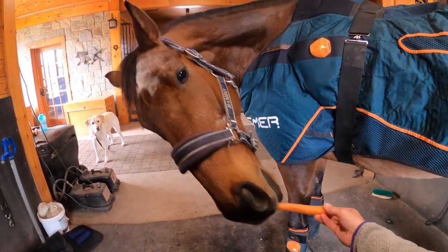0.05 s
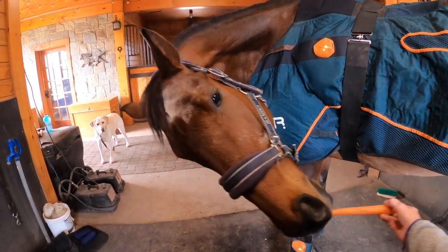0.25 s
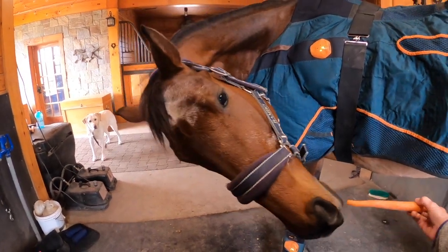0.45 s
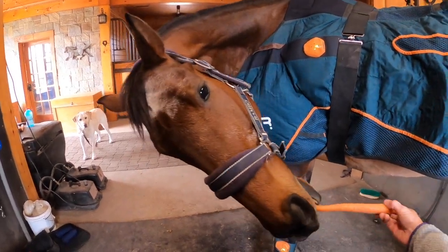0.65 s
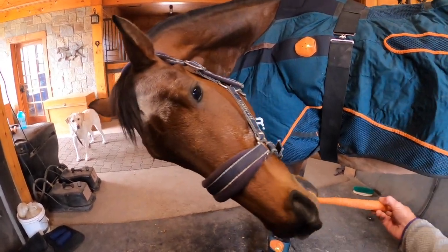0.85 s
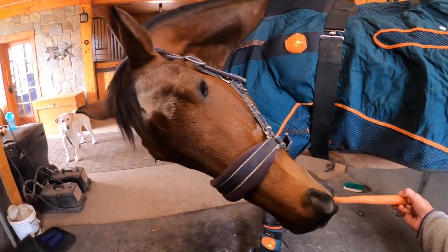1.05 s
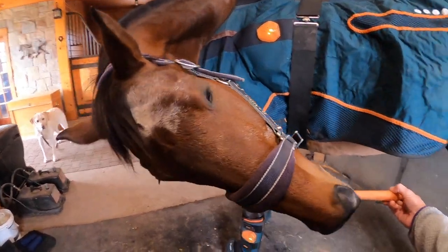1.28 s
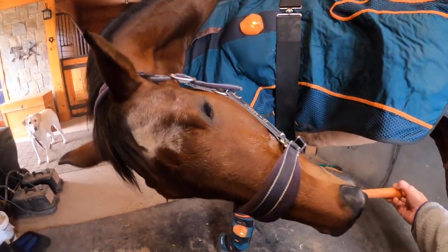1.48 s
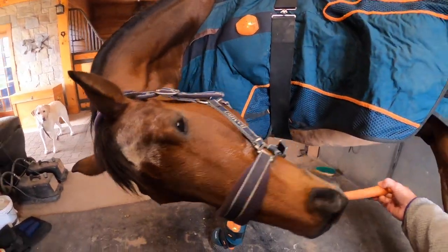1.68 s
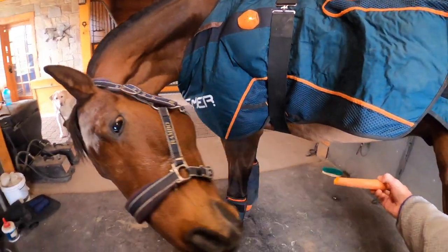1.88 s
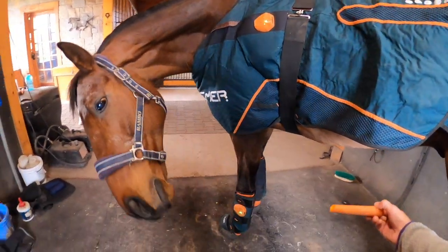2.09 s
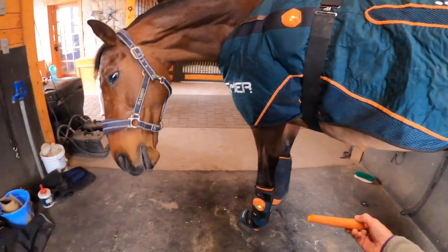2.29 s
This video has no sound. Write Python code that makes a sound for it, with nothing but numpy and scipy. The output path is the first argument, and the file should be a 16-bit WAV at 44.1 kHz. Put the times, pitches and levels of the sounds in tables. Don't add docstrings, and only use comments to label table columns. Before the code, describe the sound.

Sharp crunchy snap of a carrot bitten by a horse, after soft lip and tooth knocks

```python
import sys
import numpy as np
from scipy import signal
from scipy.fft import rfft, irfft
from scipy.io import wavfile
from scipy.ndimage import uniform_filter1d

SR = 44100
rng = np.random.default_rng(int(sys.argv[2]) if len(sys.argv) > 2 else 0)


def how_loud(loudness_db):
    steps = np.asarray(loudness_db, float) / 20
    return 10 ** steps


def log_audio(samples):
    frames = np.atleast_2d(samples).T
    limited = np.clip(frames, -1, 1)
    pcm = np.round(limited * 32767).astype(np.int16)
    wavfile.write(sys.argv[1], SR, pcm)


N = 102885

# start_s, level_db, brightness_db
CRACKS = [
    (1.8098, -23.5, -12),
    (1.8233, -14, -18),
    (1.8279, -8, -9),
    (1.8302, -7.5, -1.5),
    (1.834, -19, -4),
]
# start_s, level_db, decay_s
TEARS = [
    (1.8098, -41.5, .002),
    (1.8235, -28, .004),
    (1.8278, -12.5, 0.00093),
    (1.8290, -9, 0.0014),
    (1.8312, -17.5, 0.0019),
    (1.8335, -16, 0.00082),
    (1.8350, -14.5, 0.0012),
    (1.8377, -22, .003),
    (1.842, -28, .004),
]
# pitch_hz, level_db, t60_s
JAW_MODES = [(399, -2, 0.036), (618, -3.5, 0.032), (851, -13, 0.026), (1287, 1.5, 0.011),
             (1419, -5.5, 0.02), (1977, -6, 0.023), (2380, -1.5, 0.012), (2807, -6, 0.014),
             (3400, -5.5, 0.0035)]
# pitch_hz, level_db, t60_s
SPLINTER_MODES = [(3620, -8.5, 0.00087), (5360, -10.5, 0.0021), (6950, -6.5, 0.0018), (7940, -2, 0.0023),
                  (9130, -2.5, 0.0019), (10520, -5, 0.0012), (13000, -10.5, 0.0011), (15400, -14, 0.0013)]
# start_s, level_db, pitch_hz, t60_s, hold_s
CHOMPS = [
    (1.8236, -20, 450, 0.0051, 0.00063),
    (1.8296, -10.5, 233.6, 0.042, 0.00046),
    (1.8555, -25.5, 251.5, 0.037, .009),
    (1.873, -31, 274, 0.034, 0.0018),
    (1.886, -29, 242, 0.046, .003),
]
# start_s, level_db, pitch_hz, t60_s, hold_s
KNOCKS = [(.020, -46, 396, .03, .001), (.043, -46, 397, 0.086, .001), (.070, -47.5, 397, 0.069, 0.0011),
          (.1418, -26, 893, 0.012, .0005), (.1425, -28.5, 575, 0.01, 0.00038),
          (.1435, -35.5, 300, 0.045, 0.00085), (.4032, -38.5, 680, 0.0089, .0005),
          (.4038, -39, 372, 0.021, 0.0084), (.780, -48, 216, 0.036, .001), (.825, -50, 246, 0.1, .001),
          (.935, -48.5, 620, 0.036, .001), (.999, -45, 370, 0.056, 0.0023), (1.03, -54, 294, .03, .001),
          (1.058, -48.5, 305, 0.095, .001), (1.272, -43, 194, 0.031, 0.0027),
          (1.535, -46, 730, 0.02, 0.0009), (1.6728, -33.5, 680, 0.0085, 0.0006),
          (1.6732, -32.5, 317, 0.025, 0.0081), (1.694, -36.5, 460, 0.018, .001),
          (1.718, -44, 550, .012, .001), (1.731, -38, 450, 0.016, .001), (1.739, -31.5, 276, 0.026, .001),
          (1.748, -37, 176, 0.13, .001), (1.764, -39.5, 615, 0.013, .001),
          (2.0068, -32.5, 1000, 0.008, .0005), (1.796, -40, 440, .02, .002),
          (1.99, -42.5, 231, 0.044, 0.0034), (2.072, -45, 400, 0.023, 0.0019),
          (2.098, -45, 840, .015, .001), (.3565, -46.5, 1750, .012, 0.00075),
          (.456, -50, 2070, 0.013, .001), (2.303, -49, 690, 0.044, .001), (2.105, -36, 523, 0.028, .001)]
# start_s, level_db, pitch_hz, snap_db
TICKS = [(0.034, -41, 2840, -5), (0.0784, -42, 3760, -7), (0.143, -49, 3600, -8), (0.1678, -40, 4100, -5),
         (.175, -47, 4280, -3), (0.3166, -40.5, 4120, -12), (0.3572, -44.5, 7500, 5.5),
         (0.372, -46.5, 2980, -8), (0.401, -48, 3920, -17), (0.611, -43, 3650, -13), (.711, -42, 8500, -11),
         (0.9158, -47.5, 2870, -4), (0.9664, -41, 2500, -10), (.977, -43.5, 4170, -12),
         (1.0005, -42, 9000, -6), (1.0777, -46.5, 9000, -3), (1.272, -40, 13000, -14),
         (1.357, -49, 6000, 7), (1.4178, -34, 2700, -27.5), (1.6125, -36, 7700, -14),
         (1.646, -36, 7960, -7), (2.071, -40, 3660, -19)]
# start_s, length_s, level_db, centre_hz, sharpness (Q, no unit)
SCUFFS = [(.0, 0.11, -58.5, 1390, 6.1), (0, 0.058, -62.5, 2330, 0.81), (.558, 0.038, -60.5, 1000, 1.3),
          (.572, 0.049, -53, 1250, 1.8), (.58, 0.043, -57, 1520, 2.5), (.64, 0.028, -62, 1500, 2),
          (0.56, 0.08, -58.5, 2200, 0.48), (1.2, 0.039, -61, 2600, 1.2), (1.512, 0.091, -67, 1700, 0.7),
          (1.998, 0.11, -59, 910, 0.38), (0.055, 0.033, -58, 250, 1.2), (1.74, 0.053, -64, 7300, 0.79),
          (1.6, 0.063, -66, 1830, 1.2)]
# time_s, level_db
NECK_EFFORT = [(0, -62), (.3, -67), (1.05, -68), (1.2, -59), (1.38, -60.5), (1.5, -58.5), (1.56, -57),
               (1.8, -57), (2.05, -55.5), (2.15, -59), (2.33, -59)]
# frequency_hz, density_db (dB per Hz)
CLOTH_COLOUR = [(88, -20), (150, -6.5), (495, 4), (1110, -2.5), (1300, -4), (1670, -3), (2920, -7),
                (8100, -13), (15000, -25.5)]
# time_s, sway_db, shake_db
HAND_SWAY = [(0.0, -56, -65), (0.04, -40, -46), (0.35, -28.5, -52), (0.52, -41, -51), (0.84, -34, -57),
             (0.95, -40, -56), (1.31, -26, -37.5), (1.52, -23, -42), (1.54, -32, -60), (1.63, -17, -58),
             (1.67, -25.5, -55), (1.851, -32, -53), (1.89, -16.5, -56), (1.93, -24.5, -61),
             (2.111, -21, -62), (2.21, -26, -40), (2.29, -27, -41), (2.33, -46, -47)]
# frequency_hz, t60_s, level_db
AISLE_DECAY = [(190, 0.42, -23), (298, 0.38, -24), (450, 0.45, -29), (680, 0.39, -20.5), (900, 0.49, -19.5),
               (1420, .42, -25.5), (1700, 0.36, -22), (2480, 0.4, -22), (3380, 0.41, -20),
               (4560, 0.36, -18.5), (6300, 0.32, -20.5), (8100, 0.32, -19), (11100, 0.24, -17.5),
               (14000, 0.21, -25)]
# frequency_hz, density_db (dB per Hz)
HUSH_COLOUR = [(53, -9), (90, -1), (151, -2), (266, -4), (1680, -12), (1870, -14), (2230, -14.5),
               (15000, -23), (16000, -24.5)]

PUSH_S = 0.00034
FIBRES_PER_S, FIBRE_DB = 15000, -10.5
GLIDE, GLIDE_S = 0.31, 0.002
TICK_CYCLES, TICK_DB = 21, -0.5
CLOTH_DB, CLOTH_GRAIN_DB, CLOTH_GAIN = -52.5, 1.5, 1.3
SWAY_HZ, SHAKE_HZ, OFFSET = 12.35, 29, -0.00074
AISLE_DELAY_S = 0.0046
HUSH_DB = -58.5
RADIATE_HZ = 150
TOP_HZ = 15850


def unit(x):
    return x / np.sqrt(np.mean(x ** 2))


def band(x, hz, q):
    edges = np.clip([hz / (1 + .5 / q), hz * (1 + .5 / q)], 1, .45 * SR)
    return signal.sosfilt(signal.butter(2, edges, "bandpass", fs=SR, output="sos"), x)


def colour(x, table):
    hz, db = np.array(table).T
    f = np.fft.rfftfreq(len(x), 1 / SR) + 1
    return irfft(rfft(x) * how_loud(np.interp(np.log(f), np.log(hz), db)), len(x))


def smooth_twice(x, first, second):
    return uniform_filter1d(uniform_filter1d(x, first), second)


def walk(rate):
    k = int(SR / rate)
    steps = np.repeat(rng.standard_normal(N // k + 1), k)
    return unit(smooth_twice(steps, k, k)[:N])


def decay(t, t60):
    return np.exp(-np.log(1000) * t / t60)


def ring(hz, t60, rise_s=0.0006, glide=0., hold_s=0.):
    t = np.arange(8192) / SR
    turns = hz * (t + glide * GLIDE_S * (1 - np.exp(-t / GLIDE_S)))
    push = 1 - np.exp(-t / rise_s)
    return np.sin(2 * np.pi * turns) * decay(np.maximum(t - hold_s, 0), t60) * push


def add(out, s, x):
    i = int(s * SR)
    out[i:i + len(x)] += x[:len(out) - i]


def crack_jaw(out):
    detunes = rng.random((len(CRACKS), len(JAW_MODES)))
    for (s, db, bright_db), detune in zip(CRACKS, detunes):
        rise_s = PUSH_S * how_loud(-.8 * bright_db)
        for (hz, mode_db, t60), d in zip(JAW_MODES, detune):
            mode = ring(hz * (1 + 0.022 * (d - .5)), t60, rise_s)
            add(out, s, how_loud(db) * .5 * how_loud(mode_db) * mode)


def tear_fibres(out):
    t = np.arange(2048) / SR
    splinter = sum(how_loud(g) * ring(hz, t60, rise_s=.00005) for hz, g, t60 in SPLINTER_MODES)[:2048]
    draws = rng.random((len(TEARS), 3, 2048))
    for (s, db, decay_s), (hit, size, sign) in zip(TEARS, draws):
        breaks = (hit < FIBRES_PER_S / SR) * -np.log(size + 1e-9) * np.sign(sign - .5)
        spray = breaks * np.exp(-t / decay_s)
        add(out, s, how_loud(db + FIBRE_DB) * signal.fftconvolve(spray, splinter))


def snap():
    out = np.zeros(N)
    crack_jaw(out)
    tear_fibres(out)
    return out


def knocks(table, glide):
    out = np.zeros(N)
    for s, db, hz, t60, hold_s in table:
        body = ring(hz, t60, 0.00074, glide, hold_s)
        second = 0.32 * ring(1.88 * hz, 0.54 * t60, 0.00063, glide)
        third = 0.059 * ring(2.8 * hz, 0.37 * t60, 0.0004)
        add(out, s, how_loud(db) * (body + second + third))
    return out


def ticks():
    out = np.zeros(N)
    fade = np.exp(-np.arange(256) / SR / 0.0018)
    for (s, db, hz, snap_db), noise in zip(TICKS, rng.standard_normal((len(TICKS), 256))):
        t60 = TICK_CYCLES / hz
        pair = ring(hz, t60, rise_s=0.00021)
        pair = pair + 0.38 * ring(min(1.136 * hz, .4 * SR), t60, rise_s=0.00026)
        add(out, s, how_loud(db + TICK_DB) * pair)
        add(out, s, how_loud(db + TICK_DB + snap_db) * band(noise * fade, 6250, 0.86))
    return out


def grains(spread_db):
    return rng.standard_normal(N) * how_loud(spread_db * walk(700))


def cloth(t):
    s, db = np.array(NECK_EFFORT).T
    effort = CLOTH_GAIN * (np.interp(t, s, db) - db.max())
    rough = grains(CLOTH_GRAIN_DB)
    out = unit(colour(rough, CLOTH_COLOUR)) * how_loud(CLOTH_DB + effort + .8 * walk(14))
    for s, length, db, hz, q in SCUFFS:
        stroke = np.sin(np.pi * np.clip((t - s) / length, 0, 1))
        out = out + how_loud(db + 2.9 * walk(150)) * stroke * unit(band(rough, hz, q))
    return out


def sway(t):
    s, slow_db, shake_db = np.array(HAND_SWAY).T
    slow = colour(rng.standard_normal(N), [(1.5, -20), (3, 0), (SWAY_HZ, -5), (22, -35), (50, -90)])
    slow = slow / np.sqrt(smooth_twice(slow ** 2, 5000, 3000))
    shake = band(rng.standard_normal(N), SHAKE_HZ, 0.78)
    shake = unit(band(shake, SHAKE_HZ, 0.78))
    slow = slow * how_loud(np.interp(t, s, slow_db))
    return slow + shake * how_loud(np.interp(t, s, shake_db) - 6) + OFFSET


def aisle(x):
    t = np.arange(22050) / SR
    tail = np.zeros(len(t))
    for hz, t60, db in AISLE_DECAY:
        onset = np.clip((t - AISLE_DELAY_S - 3.74 / hz) / 0.0019, 0, 1)
        tail += how_loud(db) * band(rng.standard_normal(len(t)), hz, 1.53) * decay(t, t60) * onset
    return signal.fftconvolve(x, 0.14 * tail)[:N]


def hush():
    noise = unit(colour(rng.standard_normal(N), HUSH_COLOUR))
    low = signal.sosfilt(signal.butter(2, 900, fs=SR, output="sos"), noise)
    return how_loud(HUSH_DB) * (noise + low * (how_loud(1.8 * walk(20)) - 1))


def scene():
    t = np.arange(N) / SR
    thin = signal.butter(2, RADIATE_HZ, "highpass", fs=SR, output="sos")
    bite = signal.sosfilt(thin, snap() + knocks(CHOMPS, 0.))
    small = signal.sosfilt(thin, knocks(KNOCKS, GLIDE) + ticks())
    echo = aisle(bite + 0.5 * small)
    return (bite + small + echo + cloth(t) + sway(t) + hush())[None]


def band_limit(x):
    return signal.sosfilt(signal.butter(12, 16440, fs=SR, output="sos"), x)


def record(dry):
    low_pass = signal.ellip(10, .2, 45, TOP_HZ, fs=SR, output="sos")
    mix = signal.sosfilt(low_pass, dry)
    return band_limit(mix)


dry = scene()
out = record(dry)
log_audio(out)
```